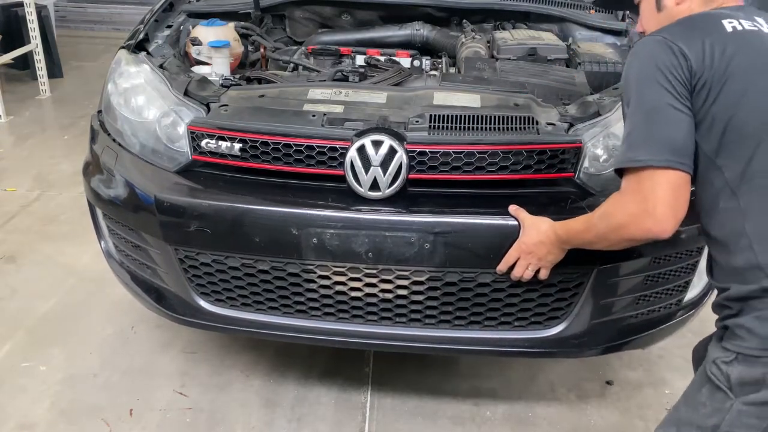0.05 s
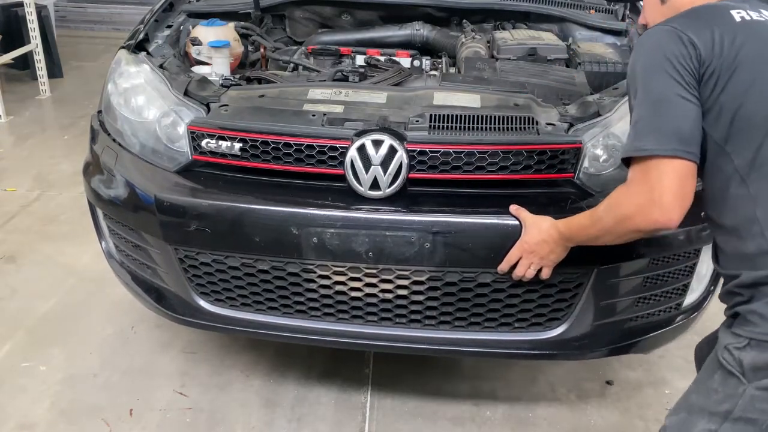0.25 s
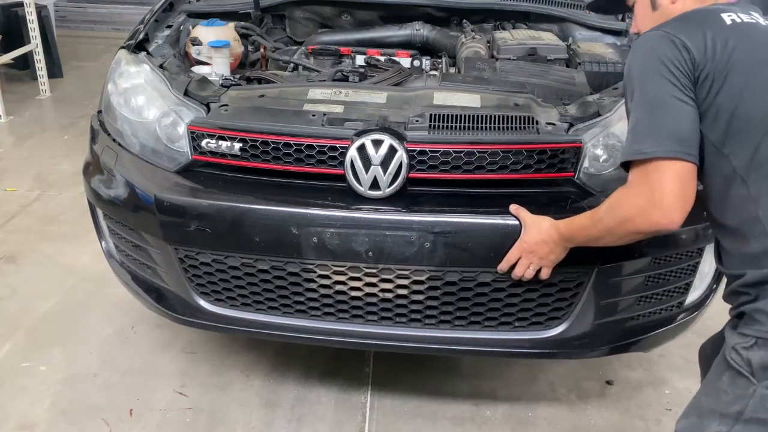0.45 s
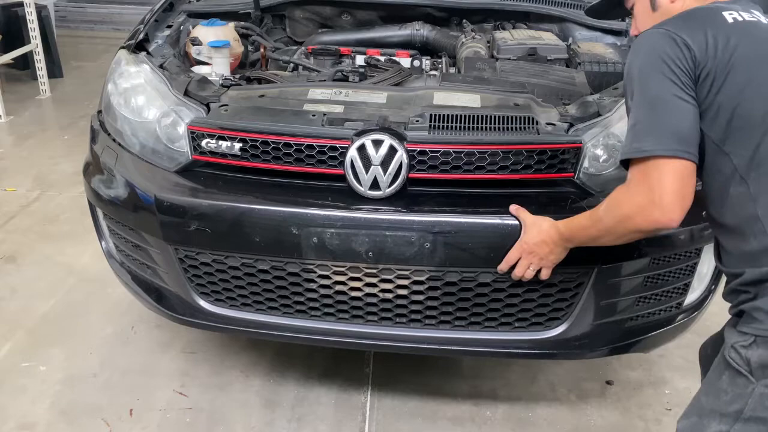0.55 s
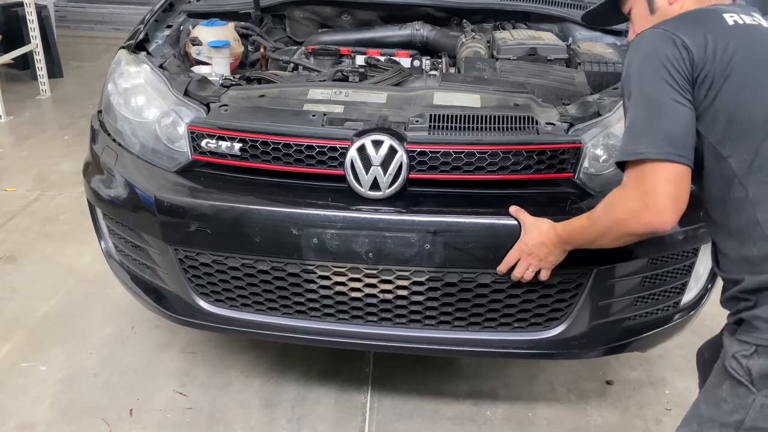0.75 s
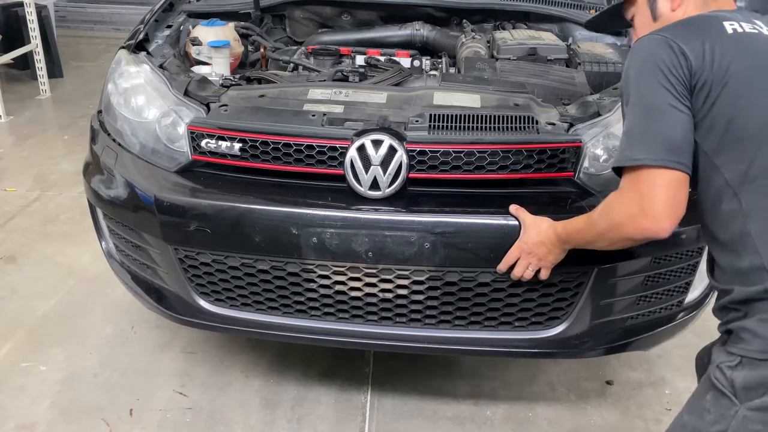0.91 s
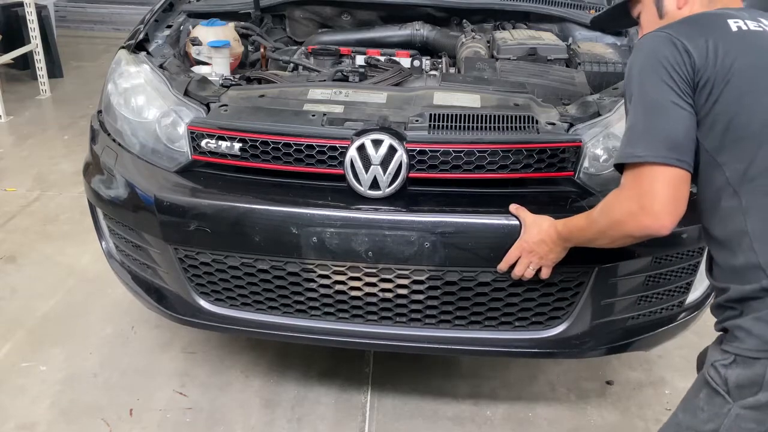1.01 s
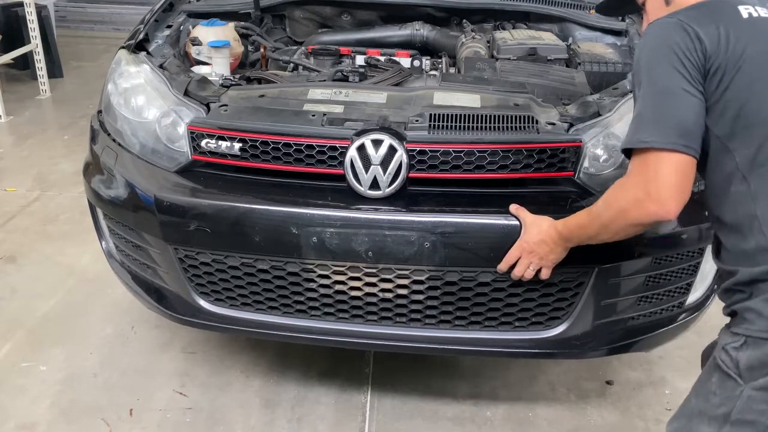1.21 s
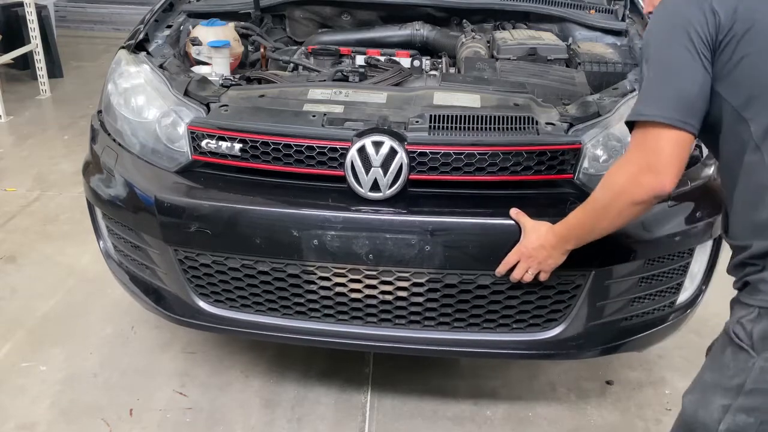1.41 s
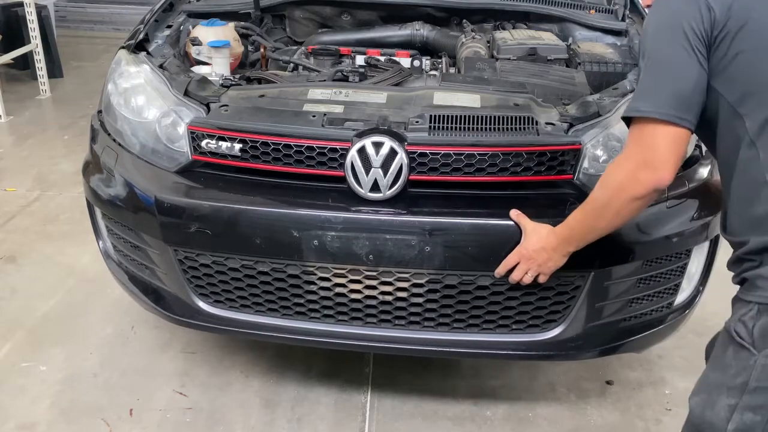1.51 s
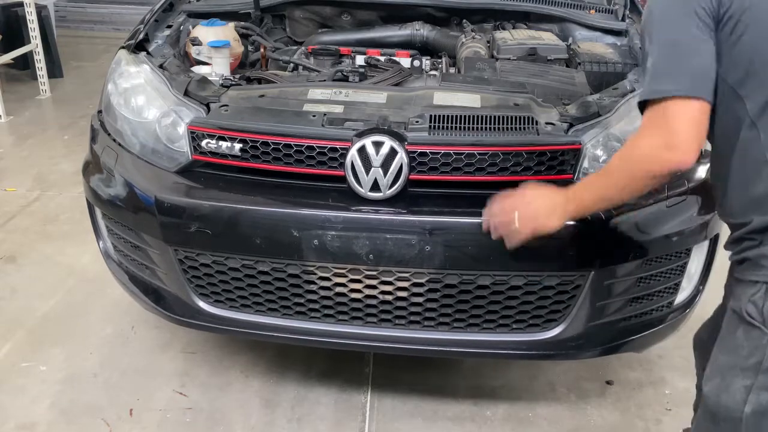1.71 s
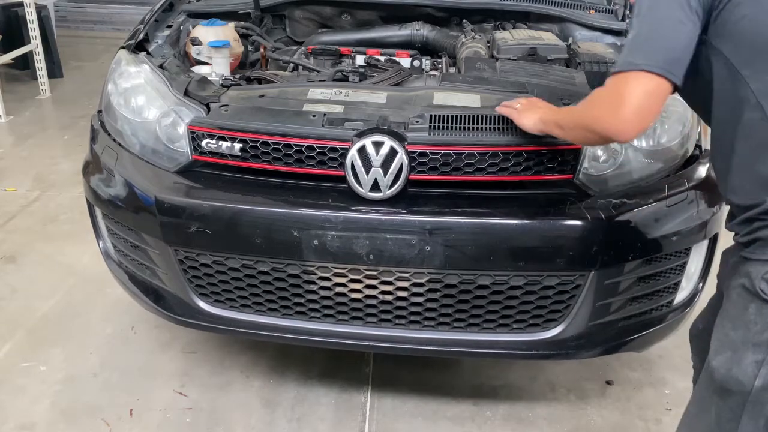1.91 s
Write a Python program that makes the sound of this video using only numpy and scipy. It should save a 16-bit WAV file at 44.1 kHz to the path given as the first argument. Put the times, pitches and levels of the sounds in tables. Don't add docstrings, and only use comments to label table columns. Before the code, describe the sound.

A plastic car bumper cover is pulled by hand: light knocks and ticks, an early sharp overloaded snap ringing through a hard, echoing workshop, then three harder tugs with dull knocks and clip ticks, close microphone.

```python
import sys
import numpy as np
from scipy import signal
from scipy.fft import rfft, irfft
from scipy.io import wavfile
from scipy.ndimage import uniform_filter1d

SR = 44100
rng = np.random.default_rng(int(sys.argv[2]) if len(sys.argv) > 2 else 0)


def gain_from_db(level_db):
    decades = np.asarray(level_db, float) / 20
    return 10 ** decades


def log_audio(samples):
    frames = np.atleast_2d(samples).T
    limited = np.clip(frames, -1, 1)
    pcm = np.round(limited * 32767).astype(np.int16)
    wavfile.write(sys.argv[1], SR, pcm)


N = 85995
SNAP_S = .2441

# f/Hz, level/dB, t60/s
PANEL_MODES = [(78, -26, .12), (113, -11.5, 0.29), (160, -7, 0.061), (233, -4, 0.056), (275.4, -8.5, 0.11),
               (318, -3, 0.047), (442.4, -1, 0.038), (489, -4.5, 0.044), (626, -3, 0.025),
               (742.7, -6.5, 0.041), (914, -2, 0.02), (1192, -3.5, 0.016), (1427, -7, 0.025),
               (1770, -12.5, 0.012)]
# f/Hz, level/dB
TICK_SPECTRUM = [(1000, -16), (1900, -2), (3100, 3), (4300, -3.5), (6000, -6), (10000, -10), (13000, -13),
                 (16000, -13)]
# t/s, level/dB
HAND_STRAIN = [(0.0, -59.5), (0.19, -44), (0.248, -33.5), (0.338, -45), (0.592, -59), (0.685, -30),
               (0.815, -54.5), (0.83, -43), (0.928, -70), (0.966, -32), (1.07, -52), (1.368, -54.5),
               (1.394, -26), (1.432, -29.5), (1.45, -21), (1.64, -52.5), (1.791, -46.5), (1.95, -70)]


def fade(t, t60):
    return np.exp(-np.log(1000) * t / t60)


def unit(x):
    return x / np.sqrt(np.mean(x ** 2))


def curve(points, hz, col=1):
    p = np.array(points)
    return np.interp(np.log(np.maximum(hz, 1)), np.log(p[:, 0]), p[:, col])


def colour(x, gain_db):
    return irfft(rfft(x) * gain_from_db(gain_db(np.fft.rfftfreq(len(x), 1 / SR))), len(x))


def octaves(hz, centre_hz):
    return np.log2((hz + 1) / centre_hz)


def add(out, x, start_s):
    i = int(start_s * SR)
    out[i:i + len(x)] += x[:len(out) - i]


def ring(modes, extra_db=0, detune=1, size=8192):
    t, m = np.arange(size) / SR, np.array(modes)
    level = gain_from_db(m[:, 1] + extra_db) * (-1.) ** np.arange(len(m))
    hz = m[:, 0] * detune
    partials = fade(t, m[:, 2:]) * np.sin(2 * np.pi * hz[:, None] * t)
    return (level[:, None] * partials).sum(0)


def floor():
    # f/Hz, level/dB per Hz
    floor_spectrum = [(15, -40.5), (25, -17), (64, -2), (256, -1), (863, -15.5), (2000, -23.5), (3160, -27),
                      (5730, -28), (16000, -46)]
    noise = rng.standard_normal(N)
    return gain_from_db(-58.5) * unit(colour(noise, lambda f: curve(floor_spectrum, f) - 40 * (f < 20)))


def rumble():
    centre_hz, level_db, swing_db = 73.4, -58, 4.5
    follow, lag_s = .3, 0.027
    t, s = np.arange(N) / SR, np.array(HAND_STRAIN)
    swing = np.interp(t * 12, np.arange(40), rng.standard_normal(40))
    tug_db = uniform_filter1d(np.interp(t - lag_s, s[:, 0], s[:, 1]), size=4000) + 48
    low = colour(rng.standard_normal(N), lambda f: -11 * octaves(f, centre_hz) ** 2)
    return unit(low) * gain_from_db(level_db + swing_db * swing + follow * tug_db)


def hall(x):
    # f/Hz, t60/s, level/dB
    hall_bands = [(150, 2.4, -19.5), (400, 0.17, -26), (1000, 1.7, -24.5), (1980, 1.2, -27.5),
                  (4000, 1.3, -26), (7040, 1.7, -28), (9300, 1, -24), (13200, 0.73, -31.5)]
    delay_s, early_db, early_t60_s = 0.0072, 9.5, 0.21
    t, noise, tail = np.arange(SR) / SR, rng.standard_normal(SR), 0
    for hz in 60 * 2 ** np.arange(0, 8.2, .5):
        band = colour(noise, lambda f: -24 * octaves(f, hz) ** 2)
        t60 = curve(hall_bands, hz)
        level = gain_from_db(curve(hall_bands, hz, col=2)) / np.sqrt(t60 * SR / 14)
        decay = fade(t, t60) + gain_from_db(early_db) * fade(t, early_t60_s)
        tail = tail + band * level * decay
    return signal.fftconvolve(x, tail * np.clip(t / delay_s - .5, 0, 1))[:N]


def scuffs():
    # t/s, length/s, level/dB, centre f/kHz
    scuff_events = [
        (0.146, .06, -84.5, 2.4),
        (1.038, 0.068, -64.5, 3.7),
        (1.367, 0.04, -59, 6.2),
        (1.645, 0.062, -66.5, 5.9),
        (1.736, 0.078, -67.5, 8.7),
        (1.894, 0.079, -69.5, 8.6),
    ]
    out, t = np.zeros(N), np.arange(8192) / SR
    for start_s, length_s, db, khz in scuff_events:
        grains = rng.standard_normal(8192) ** 3
        hiss = unit(colour(grains, lambda f: -16 * octaves(f, 1000 * khz) ** 2))
        add(out, gain_from_db(db) * hiss * np.sin(np.pi * np.clip(t / length_s, 0, 1)), start_s)
    return out


def strain():
    slips_per_s, spread_db = 450, 2.5
    creak_db, creak_hz, rub_db = -4, 441, -27
    s, f = np.array(HAND_STRAIN), np.array(PANEL_MODES)[:, 0]
    slips = (rng.random(N) < slips_per_s / SR) * rng.standard_normal(N)
    slips = slips * gain_from_db(spread_db * rng.exponential(size=N))
    body = ring(PANEL_MODES, -10 * np.log10(1 + (f / creak_hz) ** 4))
    creak = signal.fftconvolve(slips, body)[:N]
    rub = colour(rng.standard_normal(N) + slips / slips.std(), lambda hz: curve(TICK_SPECTRUM, hz) - hz / 900)
    force_db = np.interp(np.arange(N) / SR, s[:, 0], np.minimum(s[:, 1], -38))
    return (gain_from_db(creak_db) * unit(creak) + gain_from_db(rub_db) * unit(rub)) * gain_from_db(force_db)


def ticks():
    # t/s, peak level/dB, brightness/octaves from 4 kHz, t60/s
    tick_events = [(.0837, -35, -.2, .03), (.1096, -41, .1, .04), (.1214, -43, 0.1, .09),
                   (.2004, -37, -.5, .05), (.2164, -42, .1, .03), (.2294, -43, .4, .06),
                   (.6379, -44, -.3, .09), (.6704, -33, .1, .07), (.8545, -33, .2, .045),
                   (.9617, -21, .1, .04), (.9674, -25, .6, .04), (.9936, -35, -.4, .05),
                   (1.1513, -39, .7, .04), (1.1917, -50, -.4, .04), (1.2284, -53, -.5, .04),
                   (1.284, -43, .1, .04), (1.3364, -50, .1, .05), (1.3448, -30, .8, .035),
                   (1.3897, -23, .2, .04), (1.4005, -29, .4, .035), (1.4084, -30, -.3, .07),
                   (1.4431, -25, .3, .045), (1.4636, -28, -.1, .03), (1.4744, -31, .5, .04),
                   (1.4945, -36, .4, .05), (1.5589, -43, .1, .05), (1.6901, -48, .4, .05),
                   (1.7344, -51, .4, .06), (1.8073, -47, .4, .04), (1.9006, -52, .4, .04),
                   (.471, -46, 2, .03), (.699, -47, .6, .03), (1.3045, -53, 0, .04), (1.415, -33, -.2, .05),
                   (1.426, -38, .2, .05), (1.436, -38, -.2, .04), (1.455, -38, .3, .05),
                   (1.483, -39, .3, .05), (1.51, -44, 0, .07), (1.535, -46, 0, .06)]
    level_db, width_oct, attack_s = -6.5, 1.05, 0.00023
    out, t = np.zeros(N), np.arange(4096) / SR
    for start_s, db, bright, t60 in tick_events:
        noise = rng.standard_normal(4096)
        tone = colour(noise, lambda f: curve(TICK_SPECTRUM, f) - 6 * ((octaves(f, 4000) - bright) / width_oct) ** 2)
        shape = np.minimum(t / attack_s, 1) * fade(t, t60)
        add(out, gain_from_db(db + level_db) * unit(tone) * shape, start_s)
    return out


def knocks():
    # t/s, rms level over the first 23 ms/dB, brightness/octaves from 500 Hz, rattle length/s
    knock_events = [(0.082, -43, 0.2, 0.018), (0.118, -38.5, 0.55, 0.007), (0.13, -36.5, -1.13, 0.013),
                    (0.201, -29, 0.81, 0.0064), (0.25, -20, -0.53, 0.0083), (0.478, -43.5, -0.0054, 0.017),
                    (0.635, -35, -0.14, 0.024), (0.666, -28, -1.5, 0.0019), (0.686, -29, -0.32, 0.0024),
                    (0.749, -48.5, -1.2, 0.005), (0.831, -36, -0.15, 0.003), (0.856, -39, .88, 0.0057),
                    (0.9615, -17.5, -1.1, 0.00067), (0.9905, -28, 0.66, 0.0021),
                    (1.117, -42, -0.012, 0.0013), (1.184, -42.5, -0.43, 0.0035),
                    (1.194, -42.5, -0.23, 0.0028), (1.228, -54, 0.32, 0.0025), (1.283, -40.5, 0.09, 0.0037),
                    (1.3885, -19, 0.022, 0.0054), (1.41, -28.5, -.75, 0.0065),
                    (1.4446, -25.5, 0.64, 0.0024), (1.448, -26.5, -0.32, 0.0065),
                    (1.502, -29, -0.87, 0.0057), (1.554, -38, -0.41, 0.0022), (1.673, -46.5, -0.037, 0.021),
                    (1.768, -34.5, 0.22, 0.0065), (1.805, -44, -0.8, 0.013), (0.199, -25, -1.1, 0.0049),
                    (0.996, -27.5, -1.12, .008), (0.673, -28.5, -0.015, 0.0023), (.695, -30.5, -1.1, 0.014),
                    (.72, -41, -0.25, 0.011), (0.977, -22.5, -1.12, 0.0078), (1.021, -38.5, -0.85, 0.0052),
                    (1.419, -28, 0.01, 0.013), (1.436, -33, -0.67, 0.01), (1.46, -22.5, -0.55, 0.0042),
                    (1.479, -31, 0.25, 0.013), (1.518, -39, -0.91, .008), (.9618, -21, -.19, 0.0011),
                    (.962, -27, 0.25, 0.0022), (.963, -33.5, 1.5, 0.0019), (.973, -32, .3, 0.008),
                    (1.001, -32, 0.59, 0.0061), (1.391, -29, 0.66, 0.0026), (0.683, -35, 0.44, 0.0042),
                    (1.443, -26.5, -0.46, 0.0015), (1.496, -37, .9, 0.013), (0.258, -17.5, .85, 0.0085)]
    level_db, scatter_db, detune = -7, 1.5, .015
    dull_db = 2
    favoured_db, favoured_oct = 9, 0.054
    out, t, f = np.zeros(N), np.arange(2048) / SR, np.array(PANEL_MODES)[:, 0]
    for start_s, db, bright, rattle_s in knock_events:
        off_oct = np.log2(f / 500) - bright
        mode_db = scatter_db * rng.standard_normal(len(f)) - 3 * off_oct ** 2
        mode_db -= dull_db * np.maximum(off_oct, 0) ** 2
        mode_db += favoured_db * np.exp(-(off_oct / favoured_oct) ** 2)
        body = ring(PANEL_MODES, mode_db, 1 + detune * rng.standard_normal(len(f)))
        rattle = rng.standard_normal(2048) * np.exp(-t / rattle_s) * np.minimum(t / rattle_s / 0.28, 1)
        push = 0.25 * rattle + (t == 0)
        blow = signal.fftconvolve(push, body)
        add(out, gain_from_db(db + level_db) * blow / blow[:1024].std(), start_s)
    return out


def snap_far():
    # f/Hz, level/dB
    snap_spectrum = [(150, -14), (600, -1), (1700, -4), (3500, 3), (5800, -5.5), (9500, -2.5),
                     (11200, -3.5), (13000, -15.5)]
    impulse = (np.arange(N) == int(SNAP_S * SR)) * 1.
    blow = colour(impulse, lambda f: curve(snap_spectrum, f))
    return gain_from_db(23) * blow / np.sqrt(np.sum(blow ** 2))


def snap():
    # f/Hz, level/dB, t60/s
    clip_modes = [(1900, -12, 0.0045), (3200, -13, 0.0032), (4340, -1.5, 0.0028), (5590, -5.5, 0.004),
                  (6400, -2.5, 0.0025), (7600, -4.5, 0.0032), (9550, -4.5, 0.0038), (12240, -10.5, .004),
                  (14500, -27.5, 0.0016)]
    shell_modes = [(256, -12, .1), (361, -11, .08), (576, -8, .1), (620, -5, .1), (941, -4, .09),
                   (1040, -5, .11), (1437, -6, .08), (2290, -6, .06), (2450, -1, .07), (2600, -2, .07),
                   (2990, 1, .07), (3480, 2, .08), (3680, -2, .07), (3910, -1, .06)]
    clip_db, attack_s, hold_s, crack_s = -11, .0004, .0065, .002
    shell_db, choke_after_s, choke_s, choked = -15, .008, .003, .25
    out, t, t_shell = np.zeros(N), np.arange(2048) / SR, np.arange(8192) / SR
    crack = rng.standard_normal(2048) * np.minimum(t / attack_s, 1)
    crack = crack * np.exp(-np.maximum(t - hold_s, 0) / crack_s)
    rung = signal.fftconvolve(crack, ring(clip_modes, size=2048))
    add(out, gain_from_db(clip_db) * rung / rung[:256].std(), SNAP_S)
    choke = choked + (1 - choked) * np.exp(-np.maximum(t_shell - choke_after_s, 0) / choke_s)
    add(out, gain_from_db(shell_db) * choke * ring(shell_modes), SNAP_S)
    return out


def scene():
    cover = ticks() + knocks() + strain()
    cover = signal.sosfilt(signal.butter(2, 108, "high", fs=SR, output="sos"), cover)
    echoes = hall(cover + snap_far())
    return (cover + snap() + echoes + floor() + scuffs() + rumble())[None]


def band_limit(x):
    return signal.sosfilt(signal.butter(12, 16460, fs=SR, output="sos"), x)


def record(dry):
    ceiling, low_hz, top_hz = .66, 45, 15740
    x = dry / (1 + (np.abs(dry) / ceiling) ** 6) ** (1 / 6)
    x = signal.sosfilt(signal.butter(2, low_hz, "high", fs=SR, output="sos"), x)
    x = signal.sosfilt(signal.ellip(14, .2, 75, top_hz, fs=SR, output="sos"), x)
    return band_limit(x)


dry = scene()
out = record(dry)
log_audio(out)
```